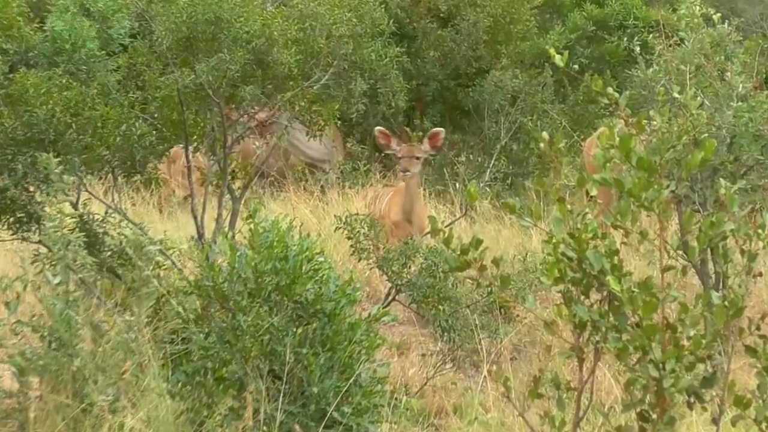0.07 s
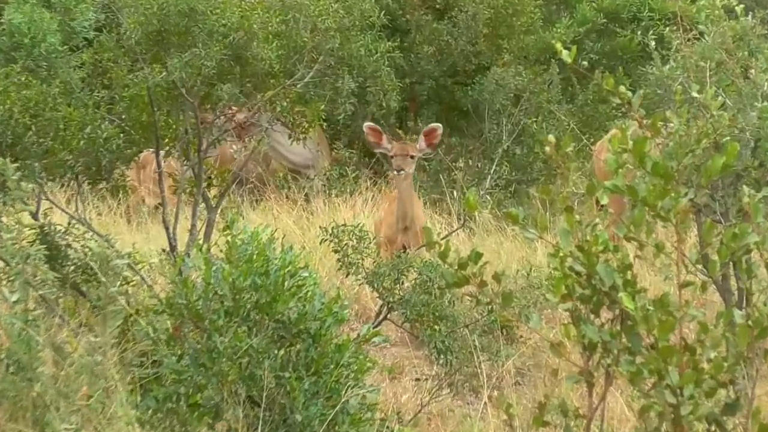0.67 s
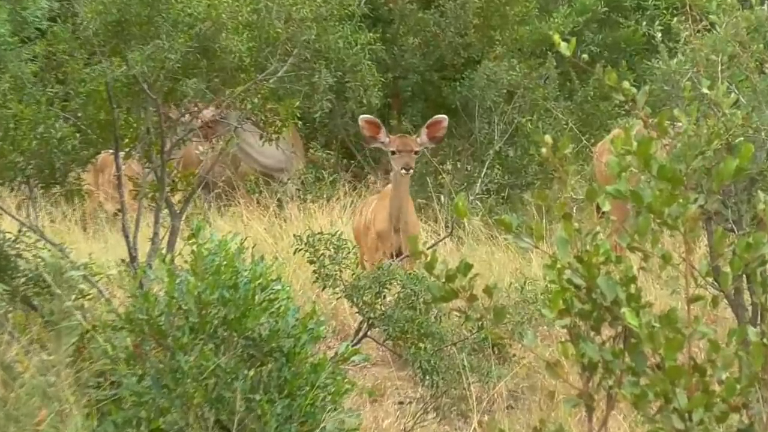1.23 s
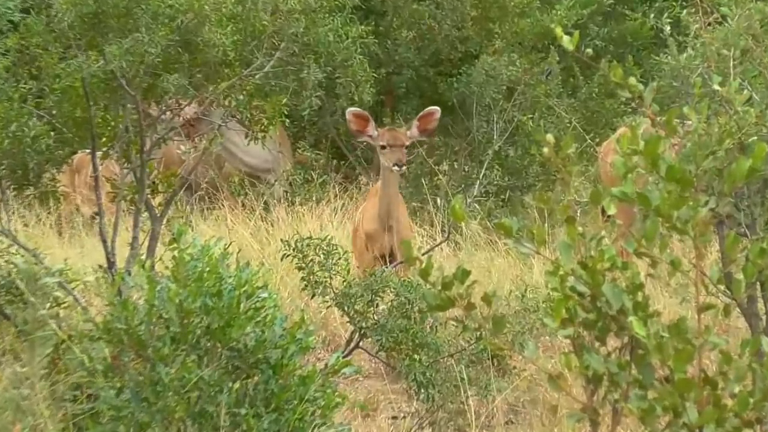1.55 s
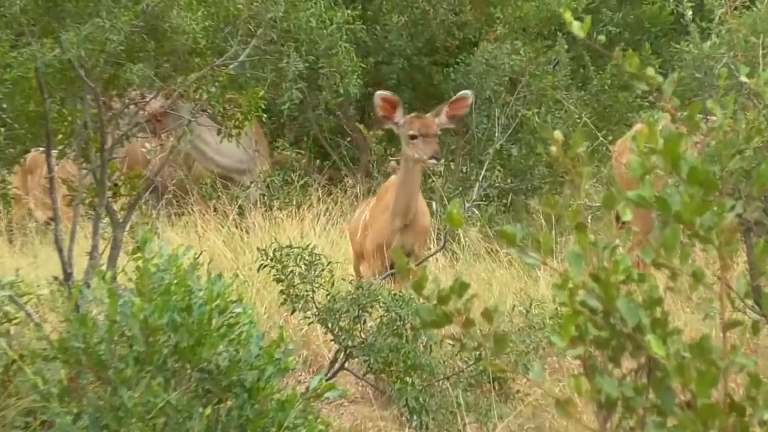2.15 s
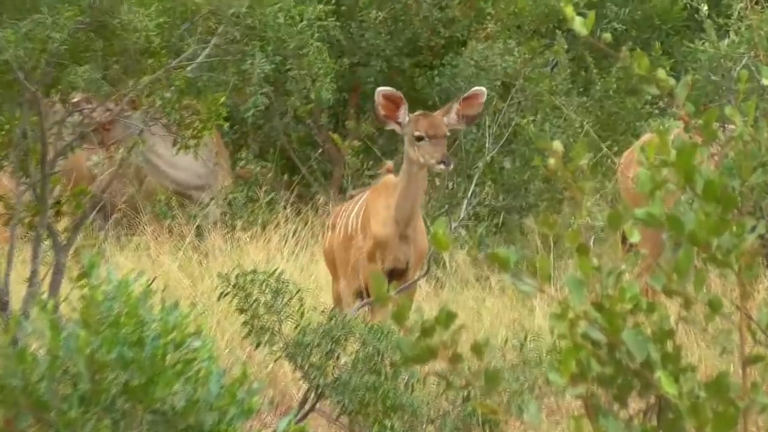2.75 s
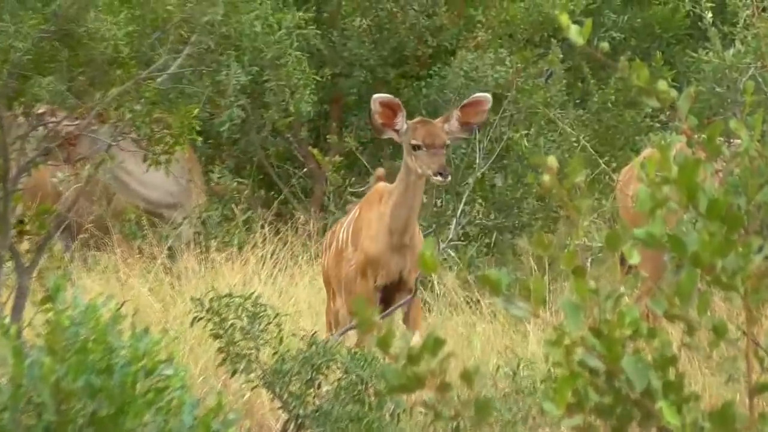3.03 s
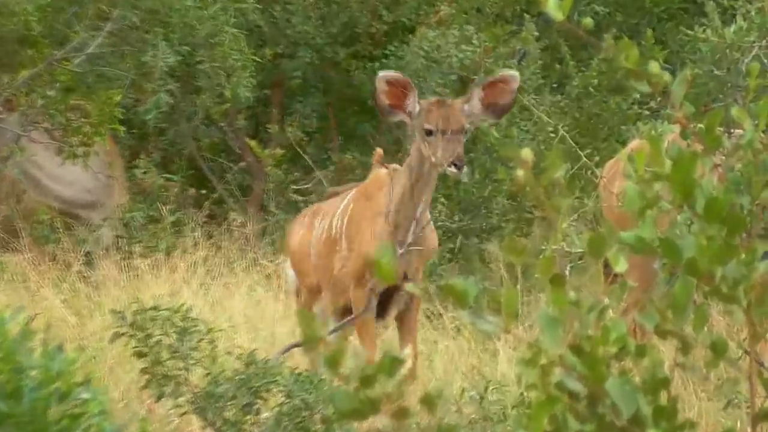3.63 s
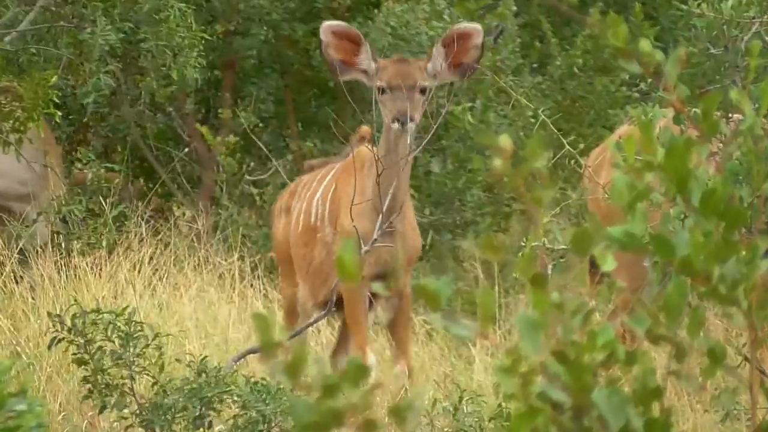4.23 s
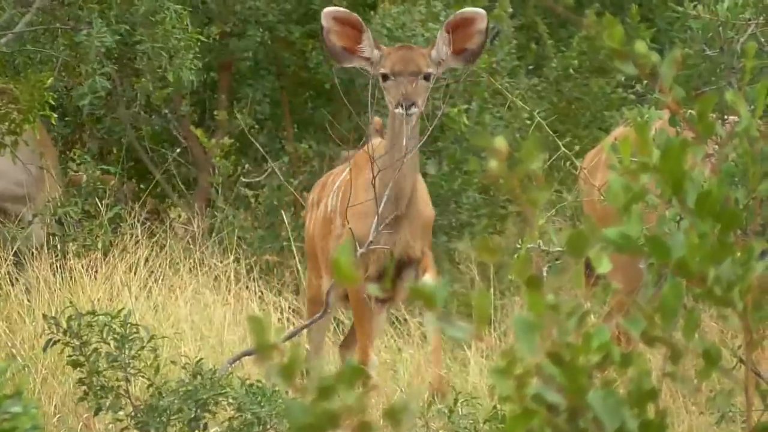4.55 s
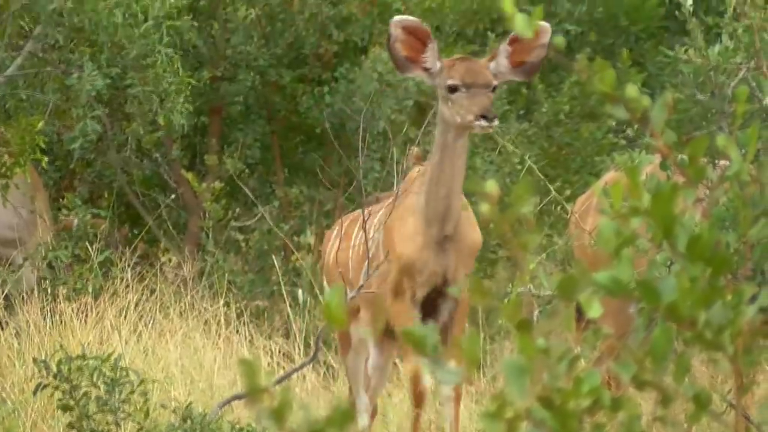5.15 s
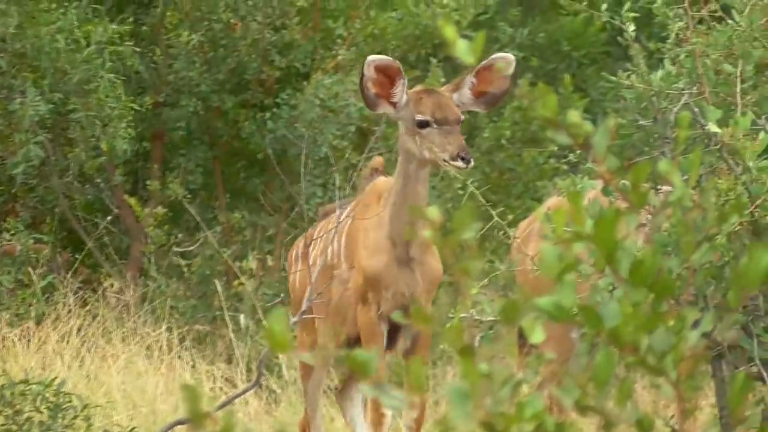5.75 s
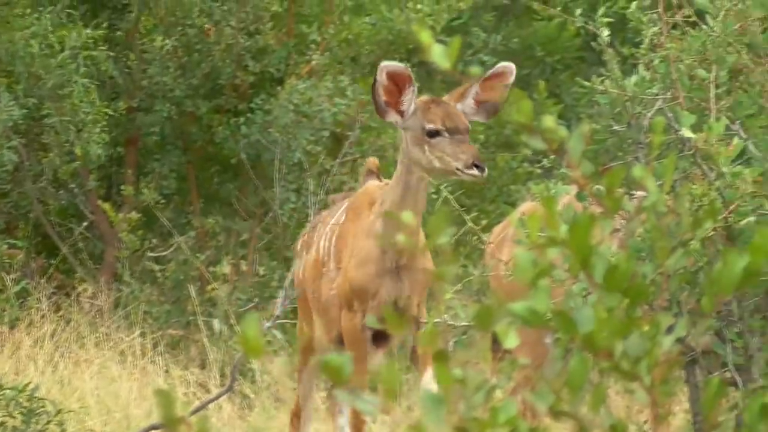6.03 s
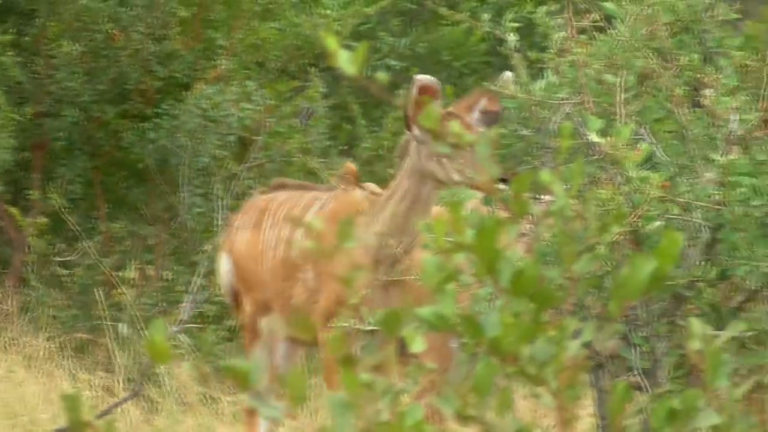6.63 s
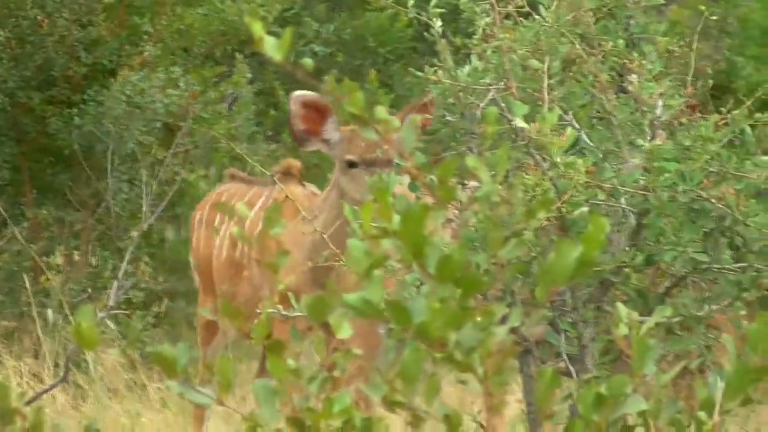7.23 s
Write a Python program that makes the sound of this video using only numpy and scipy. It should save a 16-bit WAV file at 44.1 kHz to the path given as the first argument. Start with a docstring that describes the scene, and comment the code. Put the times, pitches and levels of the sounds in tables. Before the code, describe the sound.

High, buzzy rasps from a small scolding bird repeat throughout, sounding much like an insect among leaves, a little softer after the middle. Light plastic clicks from a handled camera sound right at the microphone, with faint lens motor ticking and dull rubbing. A sharp click and then a louder knocking click stand out past halfway, followed by three tiny chips from a second bird. Faint outdoor air continues, and a soft low drone enters near the end.

```python
"""Scolding bird in dry bush

A small bird scolds in insect-like rasps, each a run of sharp upward flicks of pitch.
A second bird chips three times. Leaves scatter both voices. Close to the microphone a camera
clicks and rubs under the fingers, and its lens motor ticks and hums. A faint blip comes just
ahead of one sharp click. Faint air and hiss lie underneath; a low drone enters late."""
import sys
import numpy as np
from scipy import signal
from scipy.fft import rfft, irfft
from scipy.io import wavfile

SR = 44100
rng = np.random.default_rng(int(sys.argv[2]) if len(sys.argv) > 2 else 0)


def digitize_waveform(pressure):
    """Quantize a signal to 16-bit integers and store it at the path in sys.argv[1].

    Rows of a 2-D input are taken as channels; values are limited to [-1, 1].
    """
    field = np.atleast_2d(pressure).T
    bounded = np.clip(field, -1, 1)
    quanta = np.round(bounded * 32767).astype(np.int16)
    wavfile.write(sys.argv[1], SR, quanta)


N = 329868
T = np.arange(N) / SR
SIDES = np.array([[1], [-1]])   # left, right

# rasps: (first flick [s], last flick [s], flick count, mid-flick advance [s], full level [dB],
#         crest pitch before sag [Hz], swell [s], final fade [dB], pan L-R [dB])
RASPS = [(-0.150, 0.106, 13, 0.0, -29.5, 3660, 0.13, 5, 0),
         (0.609, 0.914, 15, 0.0048, -33.5, 3520, 0.066, 8, .5),
         (1.337, 1.587, 13, .005, -36.5, 3546, 0.25, 2, 1),
         (1.944, 2.219, 14, .005, -31, 3593, 0.066, 2, 0.5),
         (2.901, 2.982, 5, .0005, -30.5, 3374, 0.021, 10, 0),
         (2.998, 3.205, 10, .003, -33.5, 3654, 0.024, 7.5, 0.5),
         (3.632, 3.921, 14, .0035, -37.5, 3416, 0.076, 3.5, 1.3),
         (4.739, 5.101, 17, .0035, -41.5, 3190, .11, 7.5, 0.6),
         (5.642, 5.996, 16, 0.0, -41.5, 3264, 0.17, 2.1, 1.4),
         (6.474, 6.728, 12, .001, -36.5, 3385, 0.29, 8, 1), (7.132, 7.308, 9, 0.0, -35, 3415, 0.15, 1.8, 1)]
# voice source: (harmonic, level [dB])
HARMONICS = [(1, -7.5), (2, .5), (3, -10), (4, -21.5)]
# throat passband: (frequency [Hz], gain [dB])
THROAT_GAIN = [(2200, -27), (2800, -9.5), (3300, -9), (3900, -4.5), (4700, -5), (6600, -4.5), (7800, -4.5),
               (10400, -1.5), (11500, -0.5), (15000, -11.5)]
# voice noise: (frequency [Hz], density [dB])
HARSH_SPECTRUM = [(2000, -42.5), (2700, -37), (3200, -8), (3900, -12.5), (4700, -3.5), (5600, -2),
                  (6800, -4), (7800, -4), (9000, -7), (10500, -14.5), (12000, -15.5), (15500, -40)]
# second bird: (time [s], relative level [dB], lowest pitch [Hz])
CHIPS = [(5.746, -41.5, 4860), (6.019, -43.5, 4820), (6.049, -47, 4900)]
# camera clicks and, at 4.1221 s, a faint blip just ahead of the sharp click:
# (time [s], ring [dB], crack [dB], timbre, ring length [ratio], pan L-R [dB])
CLICKS_AND_BLIP = [(0.0850, -24.5, -32.5, "lever", 1.01, 2), (0.6129, -21, -31.5, "lever", 1.03, 2),
                   (1.2127, -21.5, -35, "lever", 0.67, 2), (1.8213, -23, -33.5, "lever", 1.06, 1.5),
                   (2.6357, -23, -34, "lever", 1.4, 3.5), (2.8431, -24.5, -36.5, "lever", 0.86, 2.5),
                   (4.1221, -49, -37, "button", .55, -4), (4.1325, -14, -11, "button", 0.77, -2),
                   (4.7507, -24, -36, "lever", 1.24, 4), (4.807, -28.5, -42, "lever", 0.97, 5),
                   (4.8160, -25, -49, "lever", 0.77, 3.5), (4.8900, -2, -12.5, "shell", 0.81, 0),
                   (4.8937, -6.5, -26, "shell", 0.26, -8.5), (4.949, -26, -37, "lever", 1.23, 3),
                   (5.803, -29.5, -40, "lever", 0.58, -9), (6.521, -59, -39.5, "lever", 0.53, -3),
                   (6.804, -58, -44.5, "lever", 0.91, -2)]
# body modes: (frequency [Hz], lever timbre [dB], shell timbre [dB], button timbre [dB],
#              base t60 [s], left phase lead [rad])
BODY_MODES = [(400, -19, -22, -24, .05, 1.0), (475, -13, -32, -24, .05, .6), (745, -10, -24, -24, .04, .2),
              (825, -6, 0, -20, .055, -.4), (880, -3, -22, -14, .05, .2), (970, -1, -24, 0, .05, .3),
              (1045, -3.5, -6, -3, .052, .8), (1260, -19, -21, -8, .03, .6), (1380, -17, -34, -16, .03, .4),
              (1570, -14, -38, -12, .03, .4), (2200, -26, -26, -3, .016, .3),
              (2560, -15, -36, -24, .018, .3), (2850, -20, -36, -32, .018, .3)]
# low body modes: (frequency [Hz], level [dB], t60 [s])
THUD_MODES = [(102, -8, 0.35), (153.5, -6.5, 0.16), (194.2, 5.5, 0.17), (305, -9, 0.11), (390.4, 3.5, 0.17)]
# crack noise: (frequency [Hz], density [dB])
CRACK_SPECTRUM = [(60, -26), (300, -8.5), (600, -6), (1000, 9.5), (1400, 4.5), (2200, 0.5), (2900, -3),
                  (5000, -2.5), (8500, -1), (12000, -8.5), (16000, -15)]
# finger rubs: (time [s], Gaussian width [s], level [dB], centre [Hz])
RUBS = [(0.834, 0.13, -59, 302), (3.792, 0.1, -59.5, 379.6), (4.921, 0.01, -31.5, 400),
        (5.035, 0.0088, -42.5, 910), (5.051, 0.018, -39, 483), (5.696, 0.086, -56.5, 250),
        (7.37, 0.065, -54.5, 990)]
# held motor loads: (start [s], tick [dB], hum [dB])
MOTOR_LOADS = [(-0.1, -56, -57.5), (2.0, -57.5, -59), (4.15, -59.5, -72), (4.73, -65.5, -72.5),
               (5.85, -70, -84), (6.88, -57.5, -80), (7.34, -61.5, -78)]
# bright edge of a gear tick: (frequency [Hz], density [dB])
GEAR_SPECTRUM = [(1200, -7), (2200, 3), (2900, -14.5), (3700, -1), (4200, -10), (4750, 3), (5200, -14.5),
                 (5700, -3.5), (6500, -31.5), (12000, -26)]
# motor hum: (multiple of step rate, level [dB])
HUM_PARTIALS = [(1, -3.5), (2, -12), (5, -4.5), (6, -30), (7, -12.5), (8, -21.5)]
# air and microphone hiss: (frequency [Hz], density [dB])
AIR_SPECTRUM = [(15, -50.5), (25, -14.5), (180, -2), (277, -3), (317, -1), (373, -4.5), (489, -2.5),
                (775, -7.5), (887, -3.5), (1290, -18.5), (2160, -22.5), (2350, -19.5), (4500, -19.5),
                (6300, -17), (9300, -10.5), (16000, -16.5)]
# stereo image of the air: (frequency [Hz], L-R correlation)
AIR_CORRELATION = [(60, -0.48), (130, -.3), (290, -0.58), (640, -0.71), (1410, -0.028), (3100, 0.52),
                   (6820, 0.34), (15000, -0.094)]
# hiss envelope: (time [s], relative level [dB])
HISS_LEVEL = [(0.0, -65.5), (3.58, -65.5), (7.48, -67.5)]

TIMBRES = ("lever", "shell", "button")
TIMBRE_THUD_DB = (-35.5, -24.5, -33.5)


def scolding_bird(push_s=0.0014, arch_s=0.0032, trough_hz=2300, jitter=0.021, usual_db=-35.5,
                  overhang_s=0.029, wheeze_hz=4450, wheeze_t60_s=0.00249):
    """The voice flicks up in pitch and level about 45 times a second, sinking to a harsh wheeze."""
    flicks = np.vstack([rasp_flicks(*rasp) for rasp in RASPS])
    flick_s = flicks[:, 0]
    level_db, top_hz, pan_db = in_time(flicks)
    effort_db = level_db - usual_db
    voice_gate, wheeze_gate = np.zeros((2, N))
    for first_s, last_s, *_ in RASPS:
        left_s = last_s + overhang_s - T
        voice_gate = np.maximum(voice_gate, ramp(first_s - 0.01, 0.015) * np.clip(left_s / 0.019, 0, 1))
        # gentler onset, longer wheeze ahead of it
        lead_s = 0.023 * np.clip(-np.interp(first_s, T, effort_db) / 6, 0.1, 1.3)
        breath = ramp(first_s - lead_s, 0.016) * np.clip(left_s / 0.033, 0, 1)
        wheeze_gate = np.maximum(wheeze_gate, breath)
    nearest = np.searchsorted((flick_s[1:] + flick_s[:-1]) / 2, T)
    offset_s = T - flick_s[nearest]
    push = gaussian(offset_s / push_s)
    hz = trough_hz + (top_hz - trough_hz) * gaussian(offset_s / arch_s)
    # membranes run cleanest at the top of a flick
    hz *= 1 + jitter * (2 - 1.314 * push) * drift(912) + 0.019 * drift(24.93)
    phase = 2 * np.pi * np.cumsum(hz) / SR
    tilt_db_per_oct = np.clip(effort_db, -8, 8)   # effort brightens the voice
    tone = sum(from_db(db + at_hz(THROAT_GAIN, k * hz) + tilt_db_per_oct * np.log2(k / 2))
               * np.sin(k * phase) for k, db in HARMONICS)
    voiced = tone * (from_db(3) * push + from_db(-18))
    harsh = coloured(HARSH_SPECTRUM, [(4500, 0.93), (12000, 0.33)])
    harsh *= from_db(-7.5) * push + from_db(-12)
    wheeze = unit_rms(ring(rng.standard_normal(N), wheeze_hz, wheeze_t60_s))
    wheeze *= wheeze_gate * from_db(-53 + 0.12 * effort_db)
    voice_gain = voice_gate * from_db(level_db + 0.5 * drift(30))
    return panned(pan_db) * voice_gain * (voiced + harsh) + wheeze


def rasp_flicks(first_s, last_s, count, advance_s, full_db, crest_hz, swell_s, fade_db, pan_db,
                swell_db=7, fade_s=0.1, climb=0.2, crest_at=0.97, sag_hz_per_db=16.5):
    """Effort swells, holds, fades; pitch climbs, then sags. Rows: (time, level, top pitch, pan)."""
    progress = np.linspace(0, 1, round(count))
    time_s = first_s + (last_s - first_s) * progress - 4 * advance_s * progress * (1 - progress)
    soft_db = swell_db * np.clip(1 - (time_s - first_s) / swell_s, 0, 1) ** 2
    faded_db = fade_db * np.clip(1 - (last_s - time_s) / fade_s, 0, 1)
    top_hz = crest_hz * (1 - climb * (1 - progress / crest_at) ** 2) - sag_hz_per_db * faded_db
    return np.column_stack([time_s, full_db - soft_db - faded_db, top_hz, np.full(len(time_s), pan_db)])


def chipping_bird(width_s=0.003, bend=0.11):
    """Each chip is a pure whistle that dips and rises."""
    out = np.zeros(N)
    for time_s, db, lowest_hz in CHIPS:
        offset = np.clip((T - time_s) / width_s, -6, 6)
        hz = lowest_hz * (1 + bend * np.minimum(offset ** 2, 7))
        out += from_db(db + 2) * gaussian(offset) * np.sin(2 * np.pi * np.cumsum(hz) / SR)
    return out


def foliage(x, wet_db=-10, t60_s=0.15, side_db=-4.5):
    """Leaves and twigs add a short dense tail, mostly from ahead."""
    t = T[:SR // 3]
    mid, side = rng.standard_normal((2, len(t))) * from_db(-60 * t / t60_s) * (1 - np.exp(-t / 0.005))
    tail = (mid + from_db(side_db) * side * SIDES) / np.sqrt(np.sum(mid ** 2))
    return x + from_db(wet_db) * signal.fftconvolve(x, tail, axes=1)[:, :N]


def clicks_and_blip(crack_t60_s=0.022, attack_s=0.0001, catch_hz=4680, catch_t60_s=0.071):
    """Clicks ring the camera's plastic body and metal catch; heavy ones thud. A faint blip leads one."""
    out, t = np.zeros((2, N)), T[:SR // 4]
    grit = coloured(CRACK_SPECTRUM, [(1000, 0.5), (4000, 0.62), (8000, 0.13)])
    burst = from_db(-60 * t / crack_t60_s) * (1 - np.exp(-t / attack_s))
    catch = from_db(-21 - 60 * t / catch_t60_s) * np.sin(2 * np.pi * catch_hz * t)
    for time_s, ring_db, crack_db, timbre, length, pan_db in CLICKS_AND_BLIP:
        start, column = round(time_s * SR), TIMBRES.index(timbre)
        span = slice(start, start + len(t))
        body = sum(from_db(mode_db[column] + rng.normal() - 60 * t / (t60_s * length))
                   * np.sin(2 * np.pi * hz * t + lead_rad / 2 * SIDES)
                   for hz, *mode_db, t60_s, lead_rad in BODY_MODES)
        body *= from_db(ring_db) * (1 - np.exp(-t / 0.0015))
        # low modes rock the two microphone ports out of step
        thud = sum(from_db(db - 60 * t / t60_s) * np.sin(2 * np.pi * hz * t + 0.65 * SIDES)
                   for hz, db, t60_s in THUD_MODES)
        thud *= from_db(ring_db + TIMBRE_THUD_DB[column]) * length * (1 - np.exp(-t / 0.0055))
        crack = np.array([unit_rms(port * burst) for port in grit[:, span]])
        crack *= np.sqrt(np.mean(burst ** 2))
        out[:, span] += panned(pan_db) * (body + thud + from_db(crack_db) * (crack + catch))
    return butterworth(out, 4, 80, "high")


def finger_rubs(t60_s=0.0083):
    """Skin drags on the body in brief dull swishes."""
    spectrum = [(30, -22), (100, -11.5), (400, -5), (2000, 0), (6000, -11)]
    friction = coloured(spectrum, [(500, 0.28), (2000, 0.53)])
    return sum(from_db(db) * gaussian((T - time_s) / width_s) * unit_rms(ring(friction, hz, t60_s))
               for time_s, width_s, db, hz in RUBS)


def lens_motor(step_hz=200, first_tick_s=0.0085, start_hz=2700, end_hz=1370, fall_s=0.00091,
               swell_s=0.0016, edge_s=0.0028):
    """A stepper hums at its step rate; its gears tick every fourth step."""
    tick_gain, hum_gain = from_db(motor_levels_db())
    age_s = (T - first_tick_s) % (4 / step_hz)
    # high bending waves cross the lens barrel first: each tick falls in pitch
    cycles = end_hz * age_s + (start_hz - end_hz) * fall_s * (1 - np.exp(-age_s / fall_s))
    envelope = (age_s / swell_s) ** 2 * np.exp(-age_s / swell_s) * (1 + 0.24 * drift(250))
    chirp = unit_rms(envelope * np.sin(2 * np.pi * cycles + 0.95 * drift(120) + 0.81 * SIDES))
    gear_noise = coloured(GEAR_SPECTRUM, [(1500, 0.3), (4500, 0.51)])
    edge = unit_rms(gear_noise * (gaussian((age_s - 0.001) / edge_s) + 0.29))
    ticks = unit_rms(chirp + from_db(-2) * edge)
    hum = sum(from_db(db + 2.5 * drift(22))
              * np.sin(2 * np.pi * k * step_hz * T + 0.27 * drift(12) + 0.72 * SIDES)
              for k, db in HUM_PARTIALS)
    return tick_gain * from_db(1.5 * drift(30)) * ticks + hum_gain * np.sqrt(2) * hum


def motor_levels_db(ramp_s=0.027):
    """Tick and hum levels, ramped from load to load."""
    loads = np.array(MOTOR_LOADS)
    changes_db = sum((new[1:] - old[1:])[:, None] * ramp(new[0], ramp_s)
                     for old, new in zip(loads, loads[1:]))
    return loads[0, 1:, None] + changes_db


def air(wash_db=-53, split_hz=1800):
    """A low wash of moving air under a fine hiss."""
    hiss_db, = in_time(HISS_LEVEL)
    noise = coloured(AIR_SPECTRUM, AIR_CORRELATION)
    wash = unit_rms(butterworth(noise, 2, split_hz, "low"))
    hiss = unit_rms(butterworth(noise, 2, split_hz, "high"))
    return from_db(wash_db + 0.5 * drift(6.3)) * wash - from_db(hiss_db + 9) * hiss


def drone(level_db=-55.5, start_s=6.2, rise_s=0.22, centre_hz=330, t60_s=0.029):
    """A soft band of low noise rises and stays."""
    noise = coloured([(60, -20.5), (300, 2), (1500, -9)], AIR_CORRELATION)
    return from_db(level_db) * ramp(start_s, rise_s) * unit_rms(ring(noise, centre_hz, t60_s))


def coloured(spectrum, correlation):
    """Unit-rms stereo noise of given spectrum and L-R correlation."""
    hz = np.fft.rfftfreq(N, 1 / SR)
    alike = np.clip(at_hz(correlation, hz), -1, 1)
    mid, side = rfft(rng.standard_normal((2, N))) * from_db(at_hz(spectrum, hz))
    return unit_rms(irfft(np.sqrt(1 + alike) * mid + np.sqrt(1 - alike) * side * SIDES, N))


def drift(rate_hz):
    """Smooth random wander, unit rms."""
    hz = np.fft.rfftfreq(N, 1 / SR)
    return unit_rms(irfft(rfft(rng.standard_normal(N)) / (1 + (hz / rate_hz) ** 2), N))


def ring(x, hz, t60_s):
    """Two-pole resonator."""
    radius, angle = from_db(-60 / (t60_s * SR)), 2 * np.pi * hz / SR
    return signal.lfilter([0, np.sin(angle)], [1, -2 * radius * np.cos(angle), radius ** 2], x + 1e-18)


def in_time(rows):
    """Interpolate (time [s], values...) at every sample."""
    time_s, *columns = np.transpose(rows)
    return [np.interp(T, time_s, column) for column in columns]


def at_hz(points, hz):
    """Interpolate on a log-frequency axis."""
    points_hz, values = np.transpose(points)
    return np.interp(np.log(hz + 1e-9), np.log(points_hz), values)


def butterworth(x, order, hz, kind):
    return signal.sosfilt(signal.butter(order, hz, kind, fs=SR, output="sos"), x)


def ramp(start_s, length_s):
    return np.clip((T - start_s) / length_s, 0, 1)


def gaussian(x):
    return np.exp(-x ** 2 / 2)


def panned(db):
    return from_db(SIDES * db / 2)


def from_db(db):
    return 10 ** (np.asarray(db) / 20)


def unit_rms(x):
    return x / np.sqrt(np.mean(x ** 2) + 1e-20)


def scene():
    """Birds in the bush, camera close by, air all round."""
    birds = foliage(scolding_bird() + chipping_bird())
    return birds + clicks_and_blip() + finger_rubs() + lens_motor() + air() + drone()


def record(dry):
    """Hard limit at full scale, then a steep low-pass."""
    cutoff_hz = 15900
    return signal.sosfilt(signal.cheby1(12, 0.2, cutoff_hz, fs=SR, output="sos"), np.clip(dry, -1, 1))


dry = scene()
out = record(dry)
digitize_waveform(out)
```